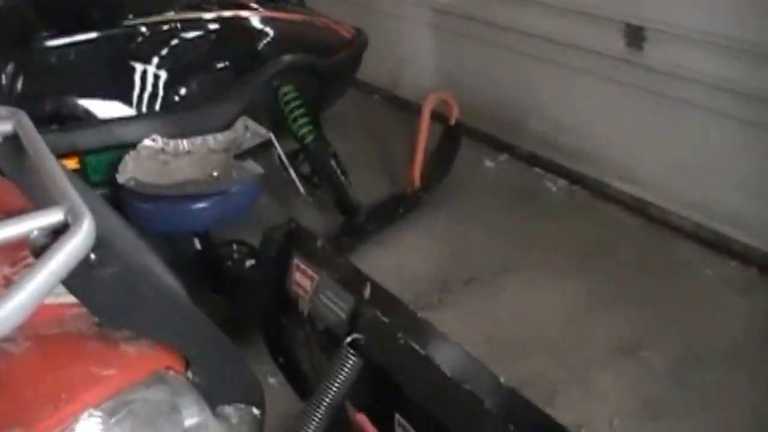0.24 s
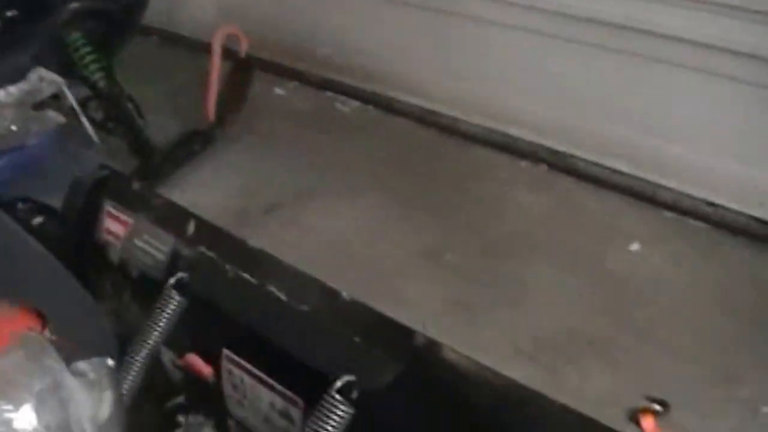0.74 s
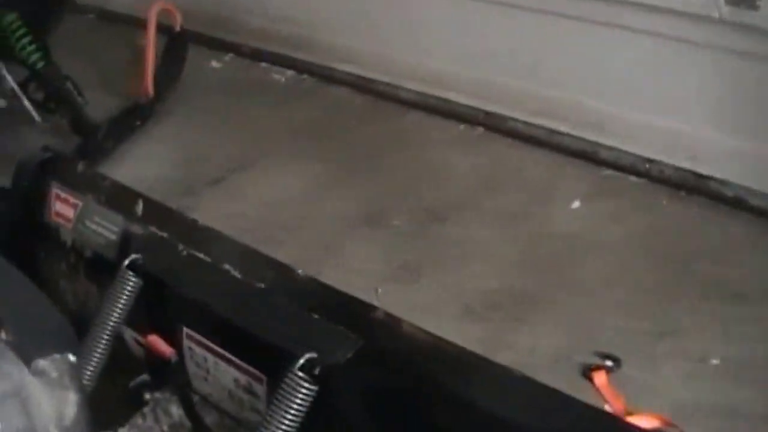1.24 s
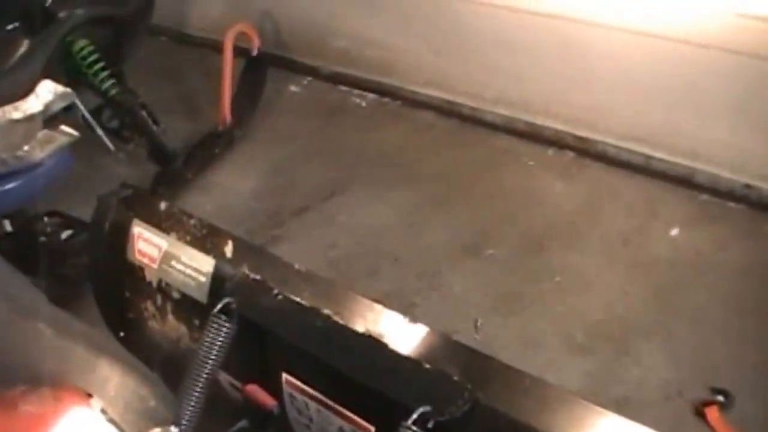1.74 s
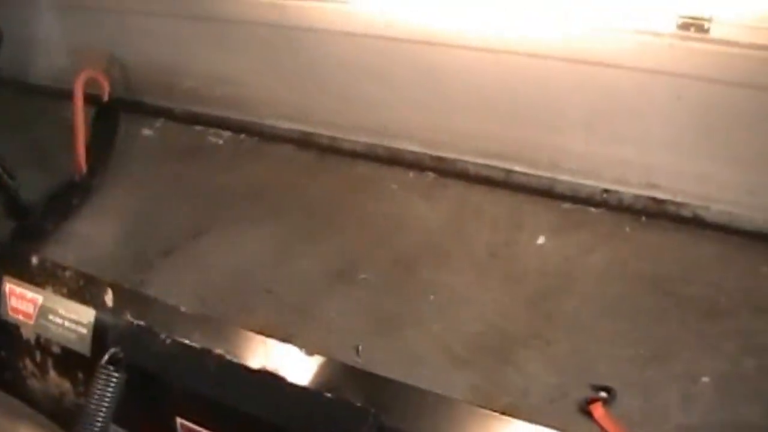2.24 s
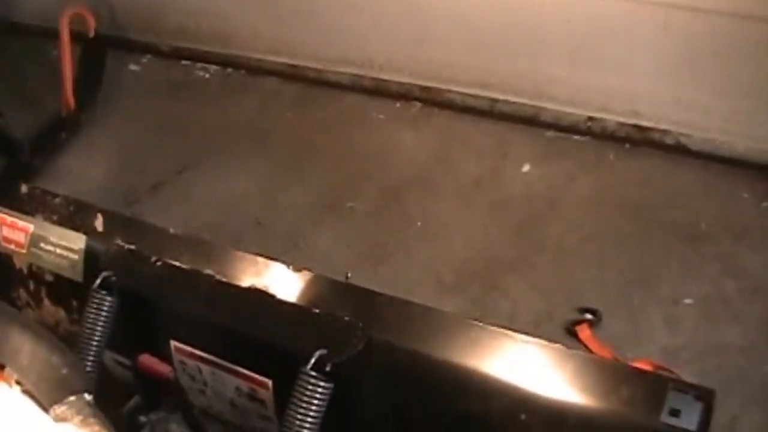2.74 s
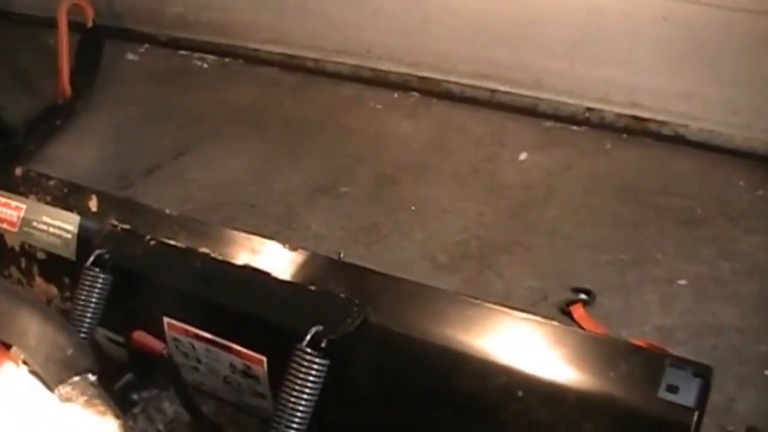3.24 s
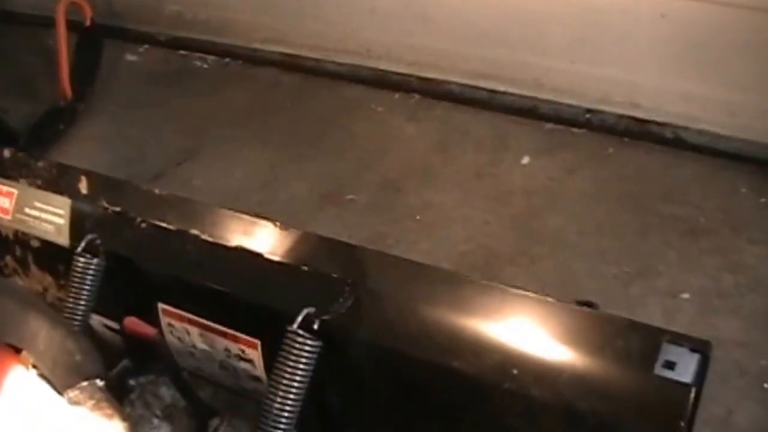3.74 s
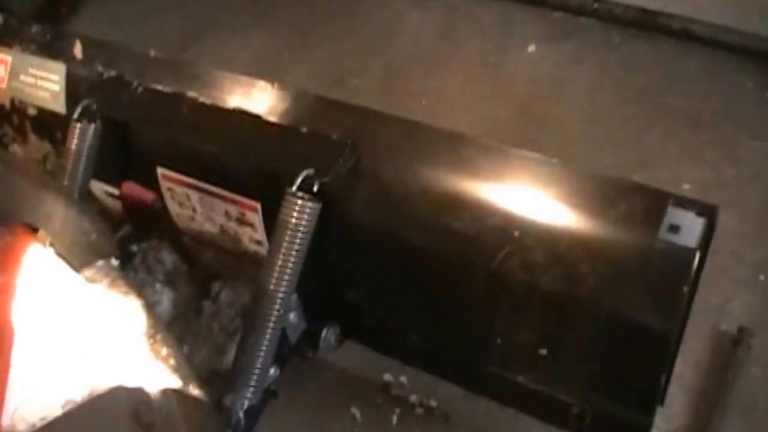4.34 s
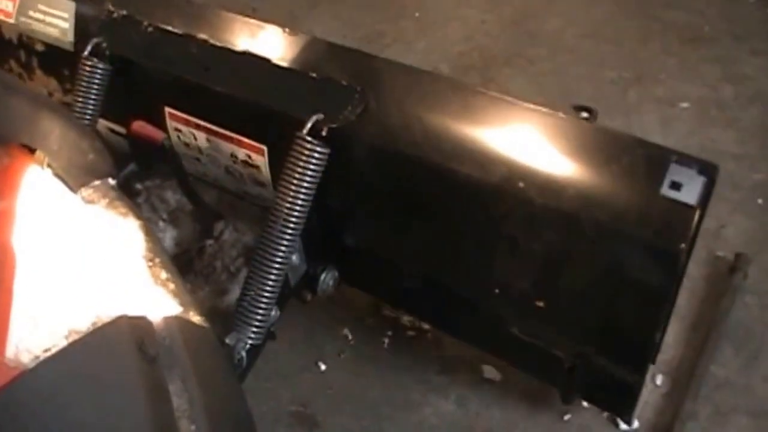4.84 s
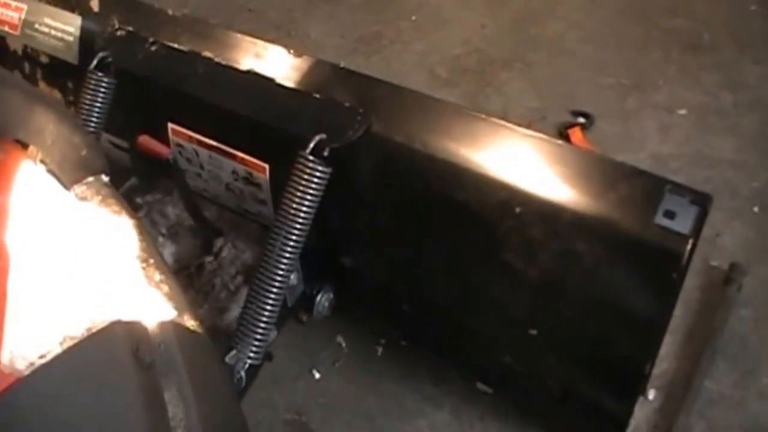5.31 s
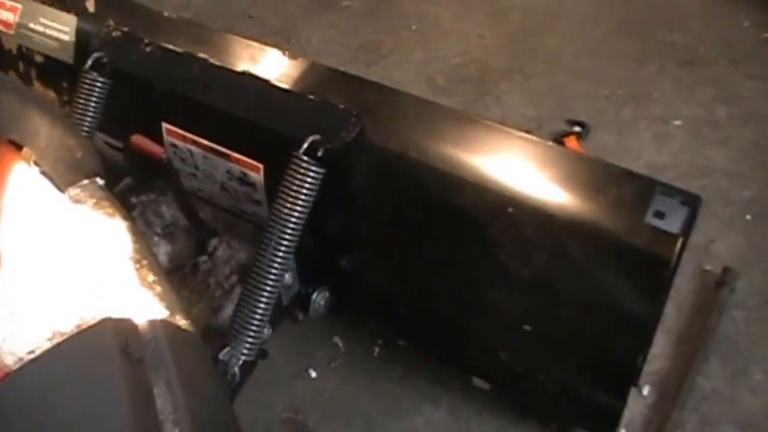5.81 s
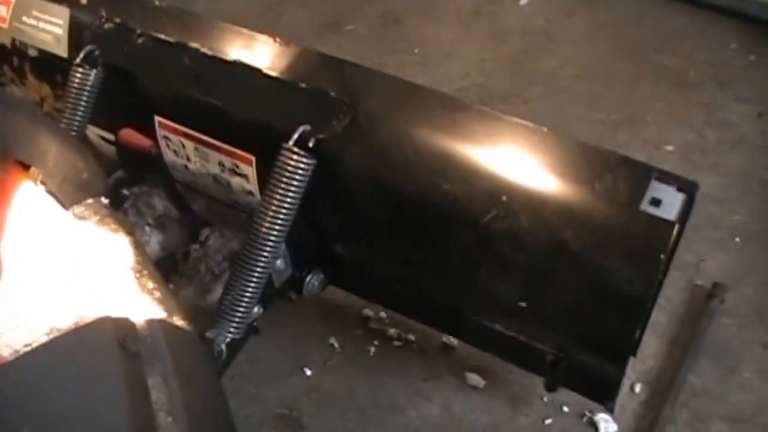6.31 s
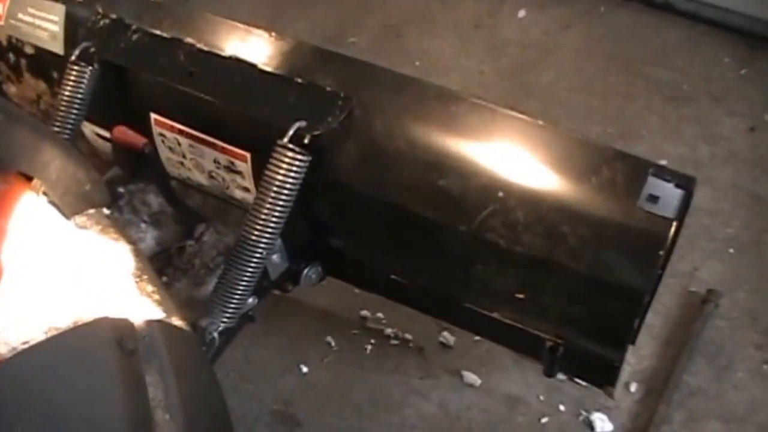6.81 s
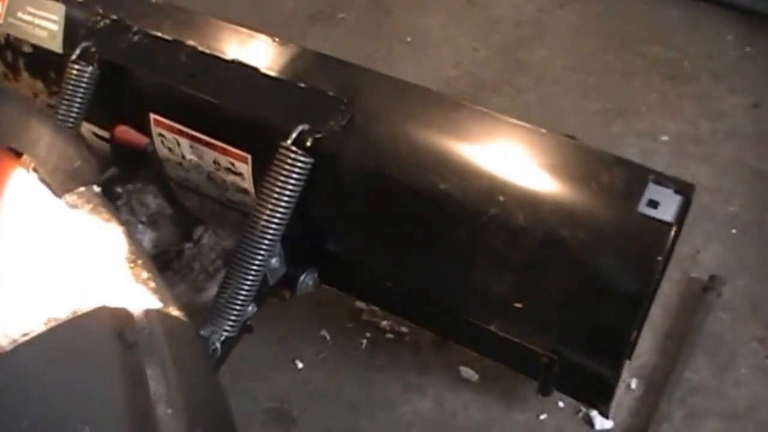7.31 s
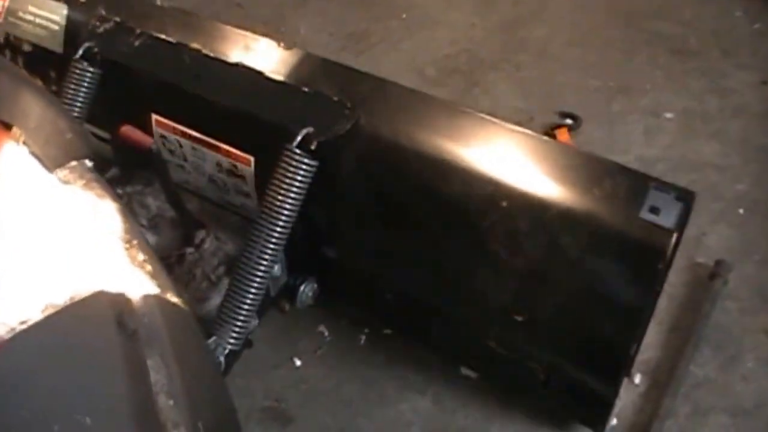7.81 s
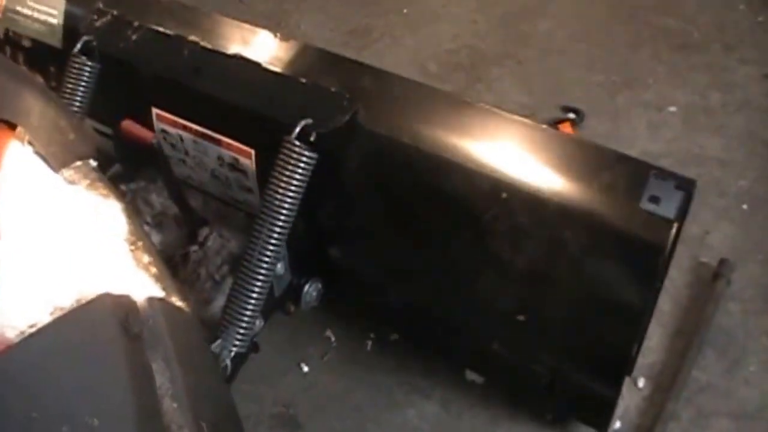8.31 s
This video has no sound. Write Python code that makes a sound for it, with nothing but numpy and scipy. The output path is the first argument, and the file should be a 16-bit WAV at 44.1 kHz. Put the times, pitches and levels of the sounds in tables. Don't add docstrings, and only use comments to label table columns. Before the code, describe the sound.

In a closed garage, key fumbling and a buzzing, whistling fuel pump lead to a clacking electric winch whining in six separate runs.

```python
import sys
import numpy as np
from scipy import signal
from scipy.fft import rfft, irfft, next_fast_len
from scipy.io import wavfile
from scipy.ndimage import uniform_filter1d, map_coordinates

SR = 44100
rng = np.random.default_rng(int(sys.argv[2]) if len(sys.argv) > 2 else 0)


def volts(x):
    e = np.asarray(x, float) / 20
    return 10 ** e


def wav_out(sig):
    wavfile.write(sys.argv[1], SR, np.round(np.clip(np.atleast_2d(sig).T, -1, 1) * 32767).astype(np.int16))


N = 377496
T = np.arange(N) / SR

# start t/s, current off t/s, tooth mesh f/Hz, lifting 0-1
RUNS = [
    (2.799, 2.95, 580, 0.16),
    (3.315, 4.1, 542, 0.96),
    (4.488, 5.228, 521, 0),
    (5.733, 6.62, 542.8, 0.97),
    (6.943, 7.82, 521.8, 0.01),
    (8.211, 8.703, 542.3, 0.99),
]
# gear case level/dB, run-down begins t/s, case fade dB/s, extra rattle fade dB/s
LOAD = [
    (-19, 2.961, 58.5, 200),
    (-19.5, 4.049, 76, 83),
    (-19.5, 5.203, 54, 65),
    (-20, 6.63, 89, 166),
    (-19.5, 7.822, 42, 51),
    (-19, 8.7, 60, 80),
]
# t/s, level/dB, half width/s
SLACK = [
    (3.645, -4, 0.026),
    (3.7, -3, 0.069),
    (4.875, -6, 0.021),
    (7.13, -2.5, 0.025),
    (7.48, -2, 0.025),
    (6.1, -1, 0.041),
]
# t/s, case level/dB, rattle level/dB, t60/s
SHAKES = [(3.004, -20.5, -21, 0.29), (3.189, -28.5, -32, 0.28), (5.187, -14, -17, 0.077),
          (5.538, -27, -25.5, 0.11), (5.56, -35.5, -48, 1.5), (2.832, -20, -16, 0.26),
          (2.905, -30, -19, 0.08), (2.952, -16, -21, 0.1), (3.424, -28, -15, 0.092), (3.575, -28, -20, .06),
          (3.661, -26, -20, .06), (3.77, -30, -23, 0.078), (4.635, -28, -21, .08), (4.895, -29, -23, .08),
          (5.774, -30, -25, .08), (6.193, -28, -16, 0.092), (6.396, -33, -19, .08), (7.01, -17, -32, .15),
          (7.165, -17, -17, 0.14), (7.505, -24, -23, .15), (4.55, -29, -23, .12), (4.035, -29, -25, 0.094),
          (6.97, -27, -40, .15), (7.775, -17, -21, 0.23), (7.795, -19, -34, 0.2), (7.885, -24, -26, 0.47),
          (8.23, -16.5, -34, 0.54)]
SHAKE_RISE_S = 0.0047
ENGAGE_S, INRUSH_DB, INRUSH_S = 0.013, 1.5, 0.16
SNAP_DB, SNAP_T60 = -14.5, 0.065
SPIN_UP_LIFT, SPIN_UP_LOWER, SPIN_UP_S = .16, .08, .05
LIFT_DRIFT, LOWER_DRIFT, MID_RUN_S = -.028, .035, .4

# multiple of mesh, level/dB
LIFT_ORDERS = [(1, -3.5), (2, -1), (3, 0), (4, -11), (5, -6.5), (6, -12), (8, -14), (10, -15)]
LOWER_ORDERS = [(1, -3.5), (2, 1.5), (3, -9), (4, -9), (5, -15), (6, -17), (7, -19), (10, -22)]
# f/Hz, level/dB per Hz
CASE = [(71, -67), (120, -43), (254, -14), (346, -14.5), (536, -3), (762, -12), (1100, -5), (1270, -9),
        (1630, -7), (2420, -14), (2640, -13.5), (3500, -18), (4550, -27), (7700, -120)]
RATTLE = [(1650, -29), (2800, -9), (2860, -12.5), (3120, -7.5), (3500, -11), (3710, -5.5), (7510, -0.5),
          (9320, -11), (10700, -17), (13400, -38), (15600, -47)]
RATTLE_DB, UNEVEN_DB = -1, 1.26
WHINE_DB, BEAT = -3.5, .55
LOWER_GROWS_DB, SEAT_S = 4, .05

# f/Hz, level/dB, t60/s
FRAME = [(262, -6, .15), (458, -2, .15), (580, -4, .2), (692, -5, .15), (977, 0, .15), (1190, -5, .1),
         (1610, -3, .2), (1890, -8, .1), (2100, -10, .1), (2715, -7, .12)]
BLADE = [(447, -8, 0.24), (541.6, 0.5, 0.85), (1110, -14, 0.69), (1597, -6, 0.06)]
LANDED = [(165, 7, 0.18), (226.5, 6, 0.25), (342.4, 0.5, 0.17), (410, 7, 0.51), (513, -12, 0.27),
          (682, 3, 0.54), (779, 1, 0.24)]
# low modes level/dB, octave mode level/dB
SWUNG = [
    (0, -20),
    (-2, -22),
    (0, -20),
    (2, -8),
    (0, -20),
    (0, -20),
]
SWING_DB, SWING_T60, SWING_RISE_S = -33, 5, .04
REST_HZ, REST_DB, REST_T60 = 715, -33.5, 1.9

# t/s, peak level/dB, thud level/dB
SOLENOID = [
    (2.794, -0.5, -11),
    (3.3169, -1, -6),
    (4.488, -2, -10.5),
    (5.7335, 0, -6.5),
    (6.942, -3.5, -6.5),
    (8.2105, -2, -6),
]
# t/s, peak level/dB, thud level/dB, t60/s, ringing f/Hz
KNOCKS = [(0.405, -33, -2, 0.013, 7400), (0.437, -33, -2, 0.014, 2500), (0.4487, -32, -6, 0.014, 7200),
          (0.498, -29, -4, 0.022, 3000), (0.6732, -14, -18, 0.007, 2570), (1.0004, -15, -12, 0.054, 7300),
          (1.2495, -18, -17, 0.017, 7350), (1.2534, -21.5, -3, 0.028, 2820),
          (1.2921, -2.5, -15.5, 0.032, 7800), (1.78, -36, 6, 0.02, 960), (1.824, -32, 12, 0.018, 880),
          (1.8665, -13, -10, 0.018, 2870), (1.875, -18, -0.5, 0.02, 2600), (1.924, -21.5, 1, 0.023, 2900),
          (1.9503, -9, -18, 0.005, 2840), (2.303, -16, 1, 0.02, 2640), (3.001, -13, 4, 0.03, 6300),
          (3.1895, -9, -6, 0.026, 6860), (3.2181, -17, -17, 0.04, 2570), (5.186, -10, 4, 0.02, 7000),
          (5.4555, -13.5, -9, 0.023, 2615), (5.4862, -15, -1.5, 0.043, 2510),
          (5.5355, -15, 2.5, 0.032, 7600), (5.676, -24, 3, 0.026, 8070), (5.692, -21, -3, 0.038, 2850),
          (7.3028, -9, 5.5, 0.022, 6590)]
# t/s, level/dB, ringing f/Hz, t60/s
CLUNKS = [(.4991, -35.2, 1450, .06), (1.0291, -23, 700, .032), (1.0302, -29, 745, .052),
          (1.2531, -36.2, 2600, .042), (1.2912, -18, 3260, .04), (1.3301, -23, 6400, .018),
          (1.783, -37, 720, .03), (1.803, -38, 600, .03), (1.8245, -34, 900, .02), (1.8665, -32, 560, .04),
          (1.9251, -30.2, 1450, .035), (2.3031, -25, 520, .048), (2.3041, -36, 400, .07),
          (2.3042, -44.2, 192, .09), (2.385, -38, 800, .05), (2.8051, -22.4, 403, .072),
          (2.8281, -9.2, 891, .034), (2.8631, -19.2, 1171, .075), (3.3331, -6.2, 693, .036),
          (3.3501, -14.6, 457, .16), (4.5501, -20.2, 963, .08), (5.1691, -10.2, 1201, .072),
          (5.7451, -18.2, 266, .07), (5.7741, -13, 1951, .04), (5.8211, -11, 2711, .07),
          (6.553, -14, 1660, .1), (7.7701, -17.2, 736, .18), (8.1021, -47, 166, .19),
          (8.2221, -19.2, 651, .048), (8.2491, -14.6, 451, .112)]
# t/s, peak level/dB
TICKS = [(5.92, -24), (6.05, -24), (6.33, -24), (7.44, -24), (7.72, -22), (2.8325, -22.5), (3.1044, -48),
         (4.3041, -49), (4.3504, -49), (4.5341, -29), (4.793, -22), (5.4114, -54), (5.7778, -23),
         (5.8167, -24.5), (6.8374, -56), (6.8619, -59), (7.1601, -18), (7.992, -24), (8.0124, -27),
         (8.0491, -41), (8.0782, -40), (8.1125, -46), (8.5091, -23)]
TICK_DB, TICK_T60 = -2.5, 0.028

# f/Hz, level/dB per Hz
SCUFF = [(35, -61), (60, -45), (372, -14), (473, -7), (679, -5), (732, -3), (891, -7), (2200, -8.5),
         (2860, -13.5), (4840, -120)]
SCRAPE = [(880, -40), (1500, -14), (2200, 1), (3500, 2), (7210, 1), (8770, -1.5), (15600, -32.5)]
# peak t/s, scuff level/dB, scrape level/dB, 20 dB rise/s, t60/s
STROKES = [(.46, -53, -51, -0.16, .59), (.515, -42, -46, -0.04, 0.54), (.71, -50, -38, 0.06, .25),
           (.787, -44.5, -36.5, .07, 0.3), (1.033, -29, -24.5, 0.02, .25), (1.065, -32.5, -31, 0.02, 0.18),
           (1.42, -44, -49, .55, .9), (1.79, -49, -62, .03, .6), (1.825, -47, -58, -0.05, .2),
           (1.928, -37, -41, 0.16, .257), (1.96, -43, -45, 0.3, 0.84), (2.37, -46, -54, 0.2, .37)]
# t/s, scuff level/dB, scrape level/dB, t60/s
SLAPS = [
    (.5, -42, -47, .3),
    (.675, -47, -45, .33),
    (1.003, -35, -30, 0.57),
    (1.251, -44, -46, 0.13),
    (1.294, -43, -37, .6),
    (1.868, -37.5, -34, .24),
    (2.304, -41, -44, .25),
]
# peak t/s, level/dB, t60/s
GLINTS = [
    (1.305, -34, .35),
    (1.35, -44, .6),
    (.45, -58, .1),
    (1.031, -30, .2),
]
# f/Hz, level/dB per Hz
GLINT = [(3000, -30), (4500, -17), (6500, -3), (7500, 4), (9000, -8), (13000, -25), (15600, -35)]
SLAP_RISE_S, GLINT_RISE_S = .002, .012

# f/Hz, level/dB per Hz
PUMP_BODY = [(710, -42.5), (1200, -8), (1570, -30), (1640, -10), (2160, -11), (2590, -13), (2680, -16),
             (3690, -15), (5850, -12.5), (6500, -10), (7330, -1.5), (8400, -12), (12900, -28), (14700, -37),
             (15500, -70)]
# f/Hz, level/dB rms
PUMP_TONES = [(2100, -58), (2150, -63), (2200, -60), (2250, -64), (2600, -61), (3660, -63), (1770, -63)]
# f/Hz, level/dB, from t/s, to t/s
OVERTONES = [(7500, -54, 1.9, 2.1), (7800, -52, 2.03, 2.1), (7600, -55, 2.0, 2.35), (8050, -57, 2.1, 2.2),
             (6750, -58, 2.05, 2.2), (7300, -53, 2.45, 2.8), (7050, -55, 2.4, 2.8), (7450, -56, 2.45, 2.8),
             (6300, -59, 2.4, 2.5), (7400, -58, 2.1, 2.4)]
# t/s, facing 0-1
FACING = [(1.5, .6), (1.84, 0.55), (1.88, 0.3), (1.96, .8), (2.14, 0.8), (2.25, 0.4), (2.43, 0.7),
          (2.55, 0.4), (2.8, 0.63)]
WHISTLE_HZ = (6340, 9515)
# from t/s, to t/s, level/dB
WHISTLES = [
    [(1.49, 1.9, -52)],
    [(1.47, 1.82, -59), (1.92, 2.15, -62), (2.38, 2.8, -59)],
]
FAINT_DB = [-64, -67]
PUMP_HZ = 50
PUMP_ON_S, PUMP_UP_S, PUMP_OFF_S = 1.51, .08, 2.8
PUMP_T60, BUZZ_DB = 2.9, -45.5
PRESSED_S, PRESS_S, TONES_DB, PRIMING_DB = 1.7, .05, 3, -26
WHISTLE_EDGE_S = .06
WHISTLE_UP, WHISTLE_UP_S = .018, .05

# f/Hz, t60/s
GARAGE = [(150, 1), (600, 0.98), (2000, 0.5), (6000, 0.74), (12000, 0.31)]
# t/s, level/dB
JOLTS = [(1.03, -72), (1.28, -71), (1.85, -65), (2.31, -73), (2.81, -58), (3.03, -39.5), (3.45, -49),
         (3.62, -62), (4.04, -53), (4.35, -63), (4.51, -52), (4.9, -58), (5.19, -46), (5.76, -54),
         (6.65, -63), (7.15, -60), (7.31, -56), (7.47, -54.5), (7.81, -42), (8.24, -58), (8.55, -52)]
# f/Hz, level/dB per Hz
JOLT = [(20, -8.5), (60, -6), (140, 0), (200, -8), (320, -60), (500, -120)]
JOLT_RISE_S, JOLT_T60, TREMOR_DB = 0.066, 0.59, -85.5
FLOOR_SHAKE_DB = -47
# f/Hz, level/dB per Hz
AIR = [(15, -75), (25, -62), (240, -16.5), (370, -10.5), (786, -8), (950, -9), (1460, -16), (1720, -12),
       (2440, -18), (7980, -23.5), (14400, -43.5), (15600, -62)]
AIR_DB = -53
# f/Hz, level/dB rms
HUM = [(382.2, -71), (576.0, -66.5), (597.5, -82), (861.3, -87.5), (931.3, -80), (958.3, -61.5),
       (1147, -70.5), (1362, -73)]

# f/Hz, likeness 0-1
ALIKE = [(60, 0.93), (200, 1), (700, 0.936), (1300, 0.91), (4400, 0.9354), (7400, 0.94), (8600, 0.55),
         (10000, 0.25), (11500, 0.5), (15000, 0.34)]
# f/Hz, level/dB
MIC = [(20, -3.5), (90, -2), (160, -1), (15000, -0.5), (16000, -26.5)]
# f/Hz, level/dB
LEAN = [(60, 0.0), (110, -1), (200, -1.0), (380, -0.5), (700, -1.0), (1290, -0.5), (2380, 0.0), (4400, 0.5),
        (8120, 0.0), (15000, 1)]


def winch():
    level, chatter = effort() * volts(UNEVEN_DB * np.array([wobble(7), wobble(7)]))
    mesh, lifting, coasting = shaft()
    since = T - this_run(RUNS)[0]
    turns = np.cumsum(mesh) / SR
    teeth = 11
    sun = 2 * np.pi * turns / teeth
    carrier = np.pi * turns / teeth
    seated = 1 - np.exp(-(since / SEAT_S) ** 2)
    paying_db = (lifting < .5) * LOWER_GROWS_DB * np.clip(since - MID_RUN_S, -1, 1)
    throb = volts(0.9 * np.sin(sun) + .8 * np.sin(carrier + 1.5 * wobble(5)) + .9 * wobble(45))

    def whine():
        tone = np.zeros(N)
        for (k, up_db), (_, down_db) in zip(LIFT_ORDERS, LOWER_ORDERS):
            runout = .7 * np.sin(sun + k) + .75 * np.sin(carrier + 2 * k + wobble(4))
            size = volts(np.where(lifting > .5, up_db, down_db) + 2.0 * wobble(40))
            size = size * (1 + BEAT * np.cos(carrier + k + 1.5 * wobble(6)))
            tone += size * np.sin(2 * np.pi * k * turns + runout + .24 * np.sqrt(k) * wobble(25))
        return unit(tone) * seated * throb * volts(WHINE_DB + paying_db - 60 * coasting / 0.081)

    def case():
        drone = coloured(patchy(grit(1.08, rate=300), depth_db=1.0), CASE)
        return volts(-2) * throb * drone + whine()

    def rattle():
        mesh_gate = 1 + 0.065 * np.cos(2 * np.pi * turns)
        impacts = coloured(patchy(mesh_gate * grit(0.49, rate=550), depth_db=1.5), RATTLE)
        return volts(-1) * throb * volts(1.3 * wobble(60) + 0.69 * wobble(17)) * impacts

    return ports(lambda: level * case() + chatter * rattle())


def shaft():
    start, off, mesh_hz, lifting = this_run(RUNS)
    missing = np.where(lifting > .5, SPIN_UP_LIFT, SPIN_UP_LOWER)
    spin_up = 1 - missing * np.exp(-np.abs(T - start) / SPIN_UP_S)
    coasting = np.clip(T - off, 0, None)
    coast = np.exp(-coasting / .5)
    drift = 1 + np.where(lifting > .5, LIFT_DRIFT, LOWER_DRIFT) * (T - start - MID_RUN_S)
    return mesh_hz * spin_up * coast * drift * (1 + 0.005 * wobble(10)), lifting, coasting


def effort():
    since = np.clip(T - this_run(RUNS)[0], 0, None)
    load_db, down_s, fade, duller = this_run(LOAD)
    late = np.clip(T - down_s, 0, None)
    slack_db = sum(db * np.exp(-((T - s) / width) ** 2) for s, db, width in SLACK)
    run_db = load_db + slack_db + INRUSH_DB * np.exp(-since / INRUSH_S) - fade * late
    run = volts(run_db) * (1 - np.exp(-(since / ENGAGE_S) ** 2))
    snap = volts(SNAP_DB - 60 * since / SNAP_T60) * (since > 0)
    s, case_db, rattle_db, t60 = np.transpose(SHAKES)
    case = np.hypot(run, swells(s, case_db, SHAKE_RISE_S, t60))
    rattle = np.hypot(run * volts(RATTLE_DB - duller * late), snap)
    return case, np.hypot(rattle, swells(s, rattle_db, SHAKE_RISE_S, t60))


def this_run(table):
    run = np.searchsorted(np.array(RUNS)[:, 0], T) - 1
    return np.array(table)[np.clip(run, 0, None)].T


def blade(x):
    _, lifting, coasting = shaft()
    landed = (1 - lifting) * np.clip(coasting / 0.02, 0, 1)
    swing = lifting * (1 - np.exp(-coasting / SWING_RISE_S)) * volts(SWING_DB - 60 * coasting / SWING_T60)
    low_db, octave_db = this_run(SWUNG)
    hum = sum(volts(db + 3.5 * wobble(16)) * np.sin(2 * np.pi * hz * T + .9 * wobble(25))
              for (hz, *_), db in zip(BLADE, (low_db - 8, low_db, octave_db)))
    shudder = landed * volts(REST_DB - 60 * coasting / REST_T60 + 4 * wobble(30))
    rest = shudder * np.sin(2 * np.pi * REST_HZ * T + 1.5 * wobble(40))
    mount = volts(-6.0) * ringing(x, FRAME)
    hanging = volts(2.0) * ringing(x * lifting, BLADE)
    grounded = volts(9.5) * ringing(x * landed, LANDED)
    return mount + hanging + grounded + swing * hum + rest


def ringing(x, modes):
    def response(f):
        total = 0
        for k, (centre, db, t60) in enumerate(modes):
            damping = 1j * f * np.log(1000) / (np.pi * t60)
            total = total + (-1) ** k * volts(db) * damping / (centre * centre - f * f + damping)
        return total
    return filtered(x, response)


def contacts():
    crack = ports(lambda: coloured(grit(1.9, rate=2500), SCRAPE))
    thud = ports(lambda: coloured(grit(0.78), SCUFF))
    out = np.zeros((2, N))
    for row in [(*hit, .06, 6500) for hit in SOLENOID] + list(KNOCKS):
        at, sound = strike(crack, thud, *row)
        out[:, at] += volts(-13.0) * sound
    s, db, _ = np.transpose(SOLENOID)
    core = swells(s + 0.0019, db - 15, 0.00105, 0.04)
    s, db = np.transpose(TICKS)
    ticks = np.hypot(core, swells(s + .001, db + TICK_DB, .001, TICK_T60))
    out += ticks * unit(np.diff(crack, n=2, append=crack[:, :2]))
    waver = wobble(60)
    for s, db, hz, t60 in CLUNKS:
        at = slice(round(s * SR), min(round((s + .3) * SR), N))
        t = T[at] - T[at][0]
        size = volts(db - 60 * t / t60) * (1 - np.exp(-t / 0.00086))
        out[:, at] += size * np.sin(2 * np.pi * hz * t + 0.5 * waver[at])
    return out


def strike(crack, thud, s, db, thud_db, t60, hz):
    t = np.arange(SR // 4) / SR
    at = slice(round(s * SR), round(s * SR) + len(t))
    bright = crack[:, at] + .3 * np.sin(2 * np.pi * hz * t)
    bright = volts(-60 * t / t60) * (1 - np.exp(-t / 0.000058)) * bright
    low = volts(thud_db - 60 * t / (3.8 * t60)) * (1 - np.exp(-t / 0.00079)) * thud[:, at]
    return at, volts(db) * (bright + low)


def hand():
    slaps = [(s, dull_db, bright_db, SLAP_RISE_S, t60) for s, dull_db, bright_db, t60 in SLAPS]
    s, scuff_db, scrape_db, rise_s, t60 = np.transpose(list(STROKES) + slaps)
    scuff, scrape = swells(s, scuff_db, rise_s, t60), swells(s, scrape_db, rise_s, t60)

    def rub():
        dull = coloured(grit(2.2, rate=270), SCUFF)
        return scuff * dull + scrape * coloured(patchy(grit(1.1), depth_db=2.5), SCRAPE)

    s, db, t60 = np.transpose(GLINTS)
    glint = swells(s, db, GLINT_RISE_S, t60) * ports(lambda: coloured(grit(1.5), GLINT))
    return glint + ports(rub)


def pump():
    running_db = np.minimum(20 * (T - PUMP_ON_S) / PUMP_UP_S, 0)
    running_db = running_db - 60 * np.clip(T - PUMP_OFF_S, 0, None) / PUMP_T60
    buzz_db = BUZZ_DB + running_db
    tones_db = TONES_DB + running_db + PRIMING_DB * (1 - np.tanh((T - PRESSED_S) / PRESS_S)) / 2
    period = round(SR / PUMP_HZ)
    beat = volts(1.2 * np.cos(2 * np.pi * np.arange(period) / period))

    def clatter(shift):
        body = np.multiply(PUMP_BODY, (shift, 1))
        pressed = .8 + .8 * (T > PRESSED_S)
        turn = lambda: np.resize(rng.standard_normal(period) * beat, N)
        return ports(lambda: coloured(pressed * turn() + grit(1.1), body))

    def loud(spans):
        return sum(volts(db) * np.clip(np.minimum(T - a, b - T) / WHISTLE_EDGE_S + .5, 0, 1)
                   for a, b, db in spans)

    def steady(hz):
        return np.sin(2 * np.pi * hz * T + rng.uniform(0, 2 * np.pi))

    facing = np.clip(curves(FACING)[0], 0, 1) * np.pi / 2
    buzz = np.sin(facing) * clatter(1.09) + np.cos(facing) * clatter(.94)
    tones = sum(volts(db + 0.5 + wobble(4.9)) * steady(hz) for hz, db in PUMP_TONES)
    drone = volts(buzz_db - 34) * np.sin(2 * np.pi * 92 * T + wobble(8))
    panels = sum(loud([(a, b, db)]) * volts(2.5 * wobble(12)) * steady(hz) for hz, db, a, b in OVERTONES)
    whistles = [np.maximum(loud(spans), volts(db + running_db)) for spans, db in zip(WHISTLES, FAINT_DB)]
    run_up = WHISTLE_UP * np.exp(-np.clip(T - 1.47, 0, None) / WHISTLE_UP_S)
    sagging = np.cumsum(1 - run_up - 0.005 * np.clip(T - 1.7, 0, 1)) / SR
    sing = sum(size * volts(2 + 1.2 * wobble(20)) * np.sin(2 * np.pi * hz * sagging + wobble(20))
               for hz, size in zip(WHISTLE_HZ, whistles))
    return volts(buzz_db) * buzz + volts(tones_db) * tones + panels + drone + sing


def garage(x):
    hz, t, z = signal.stft(rng.standard_normal((2, SR)), SR, nperseg=256)
    decay = volts(-60 * t / along(GARAGE, hz)[:, None])
    tail = signal.istft(z * decay, SR, nperseg=256)[1]
    tail[1] = 1.23 * tail[0] + 0.28 * tail[1]
    later = np.pad(x, ((0, 0), (300, 0)))
    return signal.fftconvolve(later, tail / np.linalg.norm(tail[0]), axes=1)[:, :N]


def grip():
    s, db = np.transpose(JOLTS)
    shaken = swells(s, db, JOLT_RISE_S, JOLT_T60) + volts(TREMOR_DB) + volts(FLOOR_SHAKE_DB) * effort()[0]
    return shaken * (T > .4) * ports(lambda: coloured(grit(2.2, rate=25), JOLT))


def air():
    tones = sum(volts(db + 5 + wobble(3.3)) * np.sin(2 * np.pi * hz * T + wobble(1.96)) for hz, db in HUM)
    return volts(AIR_DB - 2.5) * ports(lambda: coloured(rng.standard_normal(N), AIR)) + tones


def ports(make):
    def spread(hz):
        turn = np.arccos(np.clip(along(ALIKE, hz), -1, 1)) / 2
        return np.array([np.cos(turn), np.sin(turn)])
    mid, side = filtered(np.array([make(), make()]), spread)
    return np.array([mid + side, mid - side])


def swells(times, levels_db, rise_s, t60):
    power = 0
    for s, db, up, down in np.broadcast(times, levels_db, rise_s, t60):
        power = power + volts(db + np.minimum(20 * (T - s) / abs(up), 60 * (s - T) / abs(down))) ** 2
    return np.sqrt(power)


def grit(spiky_db, rate=900):
    return rng.standard_normal(N) * volts(spiky_db * wobble(rate))


def patchy(x, depth_db):
    z = signal.stft(x, nperseg=256)[2]
    field = uniform_filter1d(rng.standard_normal(z.shape), size=7, axis=0)
    field = uniform_filter1d(field, size=7, axis=1)
    return unit(signal.istft(z * volts(depth_db * unit(field)), nperseg=256)[1][:N])


def coloured(x, spectrum):
    return unit(filtered(x, lambda hz: volts(along(spectrum, hz))))


def filtered(x, response):
    m = next_fast_len(N + 2 * SR)
    return irfft(rfft(x, m) * response(np.fft.rfftfreq(m, 1 / SR)), m)[..., :N]


def wobble(rate):
    return map_coordinates(rng.standard_normal(int(N * rate / SR) + 4), [T * rate])


def curves(rows):
    s, *cols = np.transpose(rows)
    return [np.interp(T, s, c) for c in cols]


def along(points, hz):
    f, v = np.transpose(points)
    return np.interp(np.log(hz + 1), np.log(f + 1), v)


def unit(x):
    return x / np.sqrt(np.mean(x ** 2) + 1e-20)


def scene():
    machine, knocks = winch(), contacts()
    near = machine + knocks + blade(machine + knocks)
    room = volts(-12.0) * garage(machine) + volts(-7.5) * garage(knocks)
    return near + hand() + room + pump() + grip() + air()


def low_pass(x):
    return signal.sosfilt(signal.butter(12, 15800, fs=SR, output="sos"), x)


def record(dry):
    heard = filtered(dry, lambda hz: volts(along(MIC, hz) + np.outer([.5, -.5], along(LEAN, hz))))
    rounded = heard / (1 + np.abs(heard / .9) ** 6) ** (1 / 6)
    return low_pass(rounded)


dry = scene()
out = record(dry)
wav_out(out)
```